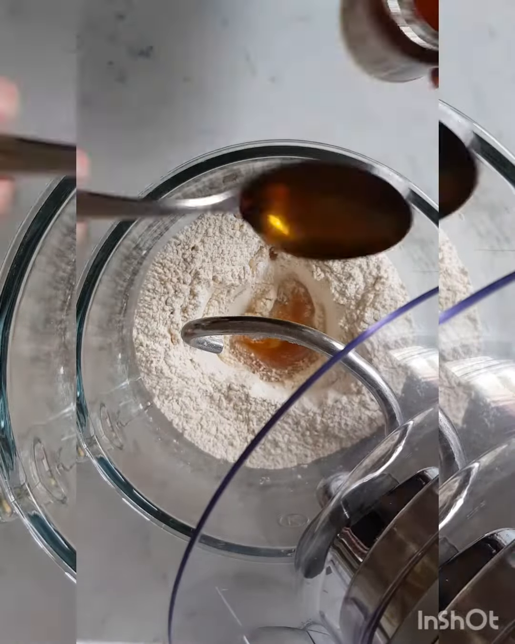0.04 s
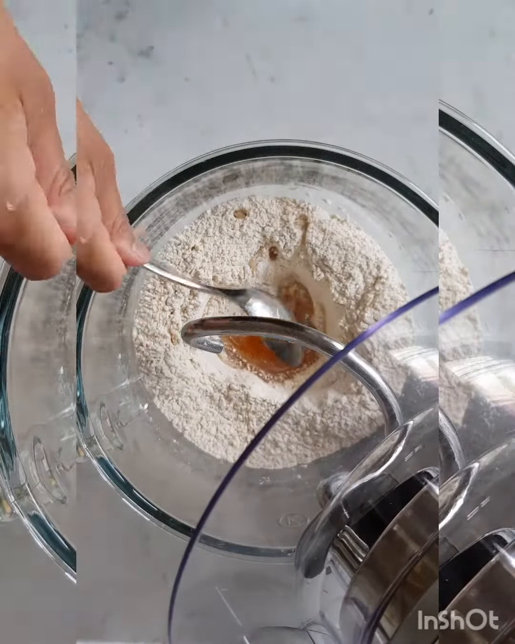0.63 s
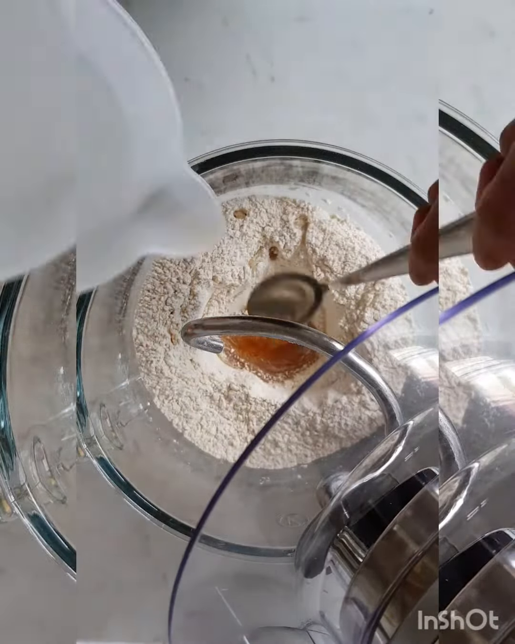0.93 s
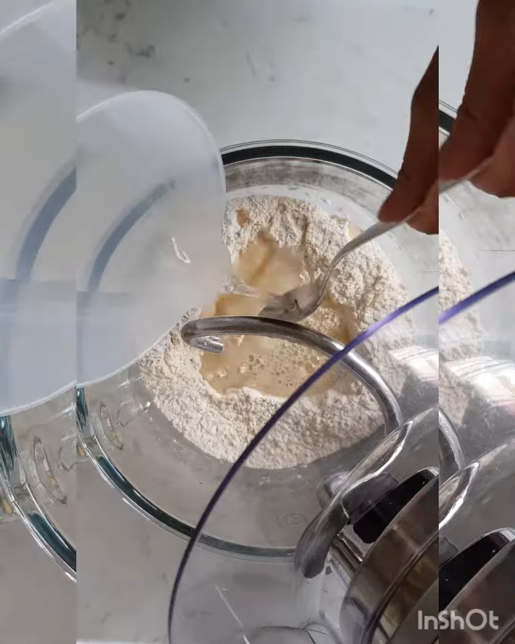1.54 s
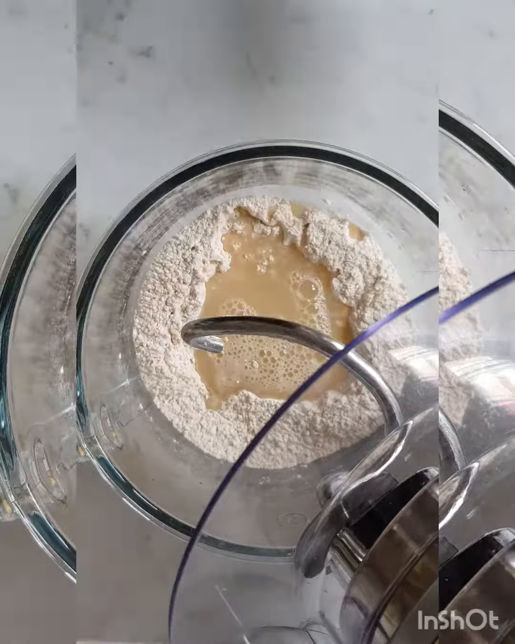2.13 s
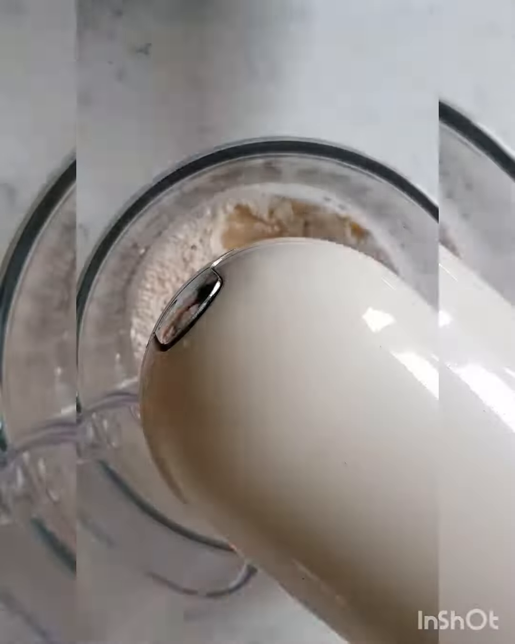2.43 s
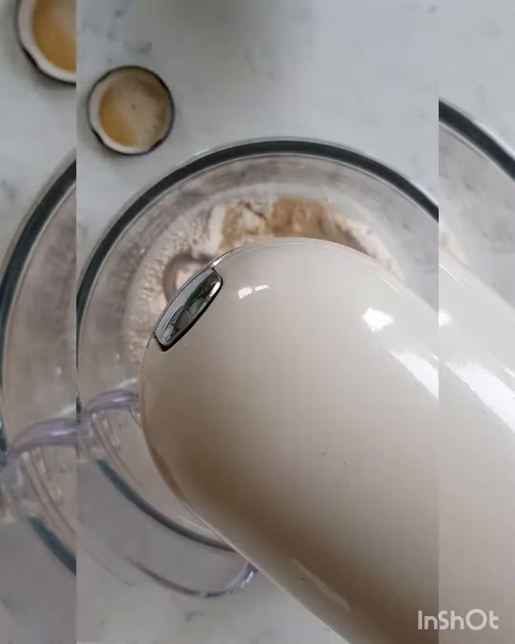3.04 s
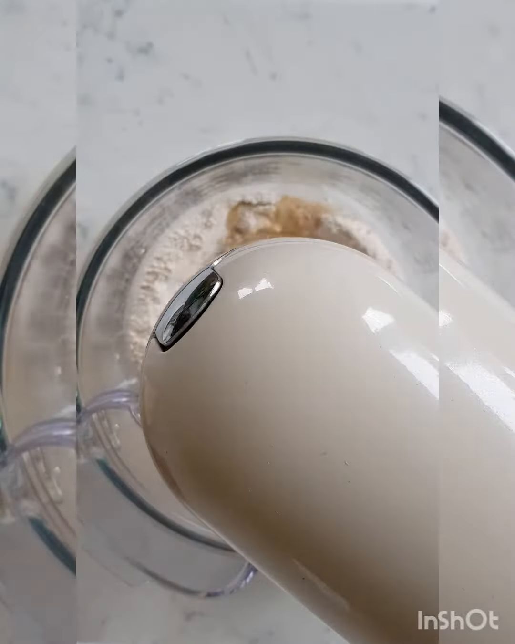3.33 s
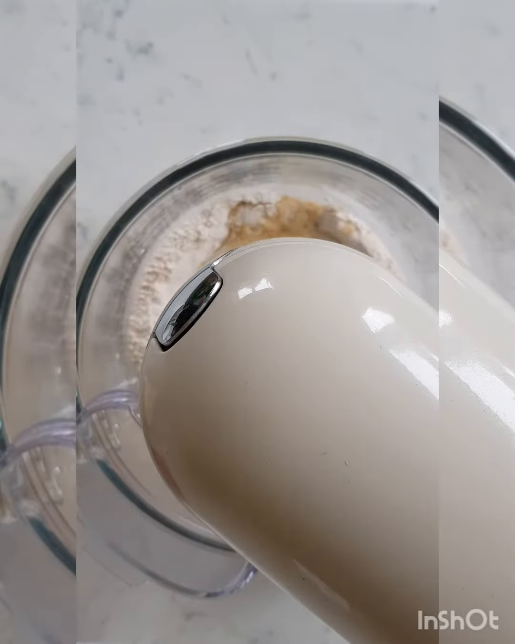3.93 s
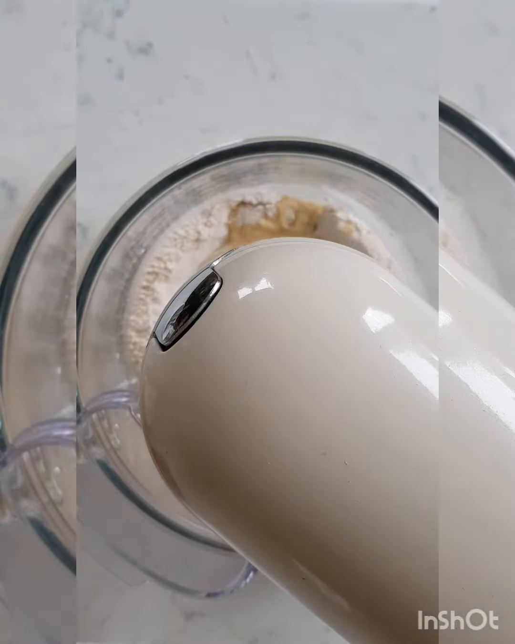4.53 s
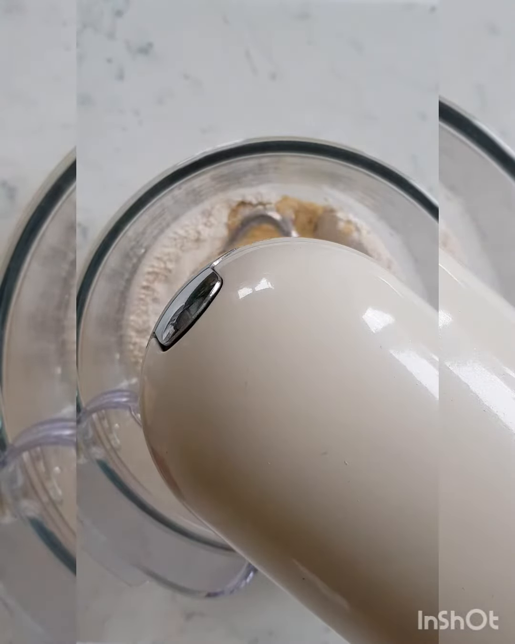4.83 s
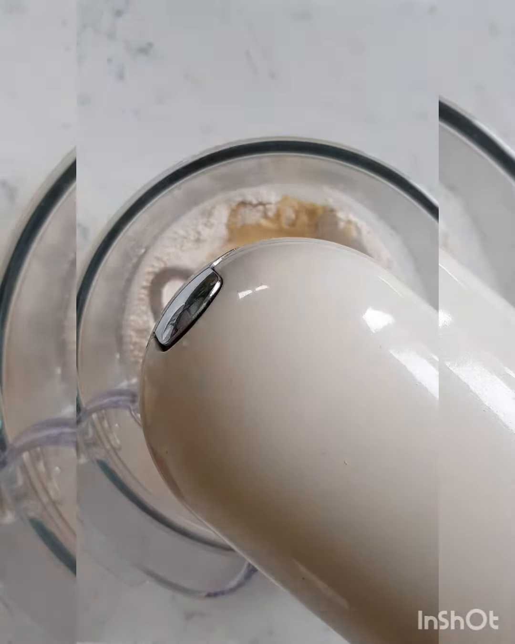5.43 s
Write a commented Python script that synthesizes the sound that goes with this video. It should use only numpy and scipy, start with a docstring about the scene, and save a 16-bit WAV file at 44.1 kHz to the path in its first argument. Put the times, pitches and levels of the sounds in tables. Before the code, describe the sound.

In a quiet kitchen, heard close up, a faint rustle and a few dull knocks and light taps open the scene, and a spoon clinks against a glass bowl at about 0.8 seconds. From 1.1 to 1.7 seconds water gulps and trickles from a jug onto flour, followed by more taps and clinks around 2 seconds. At 2.3 seconds the head of a stand mixer clunks down. At 2.5 seconds the motor jolts into a steady low hum with a whirring rush and a wavering gear whine, and a few sharp clicks follow near 2.8 seconds. From 3.4 seconds the hook bumps irregularly and makes short low groans in the wet dough as the machine rocks. At 5.5 seconds the sound drops out for an instant, then returns as a wider hum with a short hiss on the left.

```python
"""Spoon and jug work over the glass bowl of a stand mixer: dull knocks, taps, ringing clinks.
From 1.1 s water gulps and trickles onto flour. At 2.3 s the head clunks down; at 2.5 s the motor jolts
into mains hum, wavering gear whine and housing rush. From 3.4 s the hook bumps and groans in the dough.
At 5.5 s the sound drops out briefly, then returns as a wide hum with a short hiss on the left."""
import sys
import numpy as np
from scipy.fft import rfft, irfft
from scipy.io import wavfile
from scipy.ndimage import map_coordinates

SR = 44100
rng = np.random.default_rng(int(sys.argv[2]) if len(sys.argv) > 2 else 0)


def store_pcm(level_fs):
    """Save levels as 16-bit WAV."""
    pcm = np.round(np.clip(level_fs, -1, 1) * 32767).astype(np.int16)
    wavfile.write(sys.argv[1], SR, np.atleast_2d(pcm).T)


N = 251370
T = np.arange(N) / SR
HZ = np.fft.rfftfreq(N, 1 / SR)
START_S, SURGE_END_S = 2.478, 2.558
PULL_HZ = 100  # magnetic pull, twice per mains cycle

# contact registers (thud, body, clack, tick): low_hz, high_hz
REGISTERS = [(70, 180), (220, 1220), (1100, 2580), (3500, 7500)]
# light contact, per register: level_db
TAP_TONE_DB = [-13.5, -6.5, -1.5, -2]


def motor():
    """Rush, whine and hum follow one effort curve; the starting surge lifts rush and hum."""
    # motor load: time_s, effort_db
    load = [(2.6, -45), (2.72, -43.0), (2.88, -40), (3.1, -40.5), (3.36, -37.5), (3.47, -44.0),
            (3.6, -42.5), (3.88, -40.0), (4.03, -42), (4.2, -39.5), (4.43, -39.5), (4.53, -41.5),
            (4.72, -38.5), (5.02, -41.5), (5.35, -41.5), (5.44, -38.5)]
    effort_db = curve(load) - np.mean(load, axis=0)[1]
    surge = gate(0, SURGE_END_S, 0.012)
    running = rush(effort_db, surge) + gear_whine(effort_db) + hum(effort_db, surge)
    return running * gate(START_S, 6, 0.014)


def hum(effort_db, surge):
    """Mains hum whose harmonics waver slightly, over a low rumble."""
    # pull harmonics: multiple, level_db
    harmonics = [(1, -3), (2, -6.5), (3, -13.5), (4, -18.5), (6, -20), (7, -17)]
    # rumble spectrum: freq_hz, density_db
    rumble = [(20, -16), (45, -17.5), (75, -9), (115, -3), (140, 4), (170, -9), (240, -10), (330, -26),
              (600, -69)]
    phase = 2 * np.pi * PULL_HZ * T + 0.075 * wobble(7)
    tone = sum(amp(db + 1.1 * wobble(12)) * np.sin(k * phase + 0.33 * wobble(14)) for k, db in harmonics)
    settled = gate(3.42, 6, 0.11)  # hook has broken into the dough
    level_db = -37 + 0.085 * effort_db - 2.7 * settled + 3 * surge
    return amp(level_db) * (np.sqrt(2) * tone + amp(-2.5) * noise(colour(rumble)))


def rush(effort_db, surge):
    """Brushes and gear teeth chatter, hiss and ring in the housing."""
    # housing rush spectrum: freq_hz, density_db
    rush_spectrum = [(130, -31), (230, -8), (330, -11), (420, -8), (530, -15), (620, -6), (850, -13.5),
                     (1100, -8.5), (1350, -8.5), (1700, -14), (2200, -11.5), (2900, -13), (3400, -22),
                     (5000, -44)]
    # brush hiss spectrum: freq_hz, density_db
    brush_spectrum = [(2060, -26), (3500, -4.5), (3910, 4), (4410, -4), (5000, 0), (5580, -5.5),
                      (6650, -3.5), (8850, -6.5), (10200, -7), (11900, -12), (13000, -57)]
    # housing resonances: centre_hz, half_width_hz, level_db
    modes = [(402.6, 16.2, -7), (720, 57, -12.5), (940, 15, -17), (1277, 67, -4.5), (1540, 51, -50),
             (2124, 90, -9), (2693, 33, -17), (3080, 330, -15), (4936, 40, -23), (8670, 360, -25.5)]
    chatter_db = 1.1 * wobble(350) + 0.8 * wobble(30) + 0.5 * np.sin(2 * np.pi * PULL_HZ * T)
    mode_power = sum((amp(db) * unit(1 / (1 + ((HZ - hz) / half_hz) ** 2))) ** 2
                     for hz, half_hz, db in modes)
    housing = amp(-4) * noise(colour(rush_spectrum)) + amp(-3.5) * ticks(np.sqrt(mode_power), per_s=900)
    brush_gain = colour(brush_spectrum)
    brushes = amp(-2.5) * noise(brush_gain) + amp(-9) * ticks(brush_gain, per_s=1100)
    housing_db = -38 + 0.79 * effort_db + 8 * surge
    brush_db = -52 + 0.78 * effort_db + 4 * surge
    return unit(amp(chatter_db)) * (amp(housing_db) * housing + amp(brush_db) * brushes)


def gear_whine(effort_db):
    """Meshing teeth: one wavering tone, louder with effort."""
    # gear mesh: time_s, pitch_hz
    mesh = [(2.6, 1262), (2.95, 1267), (3.15, 1242), (3.4, 1259), (4.3, 1279), (4.7, 1249), (4.95, 1277),
            (5.1, 1265)]
    phase = 2 * np.pi * np.cumsum(curve(mesh) + 7 * wobble(25)) / SR
    return amp(-46 + 0.82 * effort_db) * unit(amp(2.1 * wobble(40)) * np.sin(phase))


def jolt():
    """Inrush current shakes the head until the shaft is up to speed."""
    # buzzing parts: pitch_hz, level_db
    parts = [(400, -35), (690, -53), (810, -43.5), (1310, -36.5), (2110, -38.5), (2740, -41.5)]
    shaking = 1 + 0.41 * np.sin(2 * np.pi * PULL_HZ * T)
    buzz = sum(amp(db) * np.sin(2 * np.pi * hz * T + 1.06 * wobble(70)) for hz, db in parts)
    return gate(START_S, SURGE_END_S, 0.01) * shaking * buzz


def bumps():
    """The hook shoves dough against the bowl; the machine rocks on its feet."""
    # hook blows: centre_s, half_length_s, level_db, tilt_db_per_octave, ring_hz
    shoves = [(3.657, 0.0043, -22, -5, 151), (4.206, 0.009, -34.5, -2, 146), (4.444, 0.011, -43.5, 1, 1750),
              (4.744, 0.013, -39.5, 1.5, 459.8), (4.907, 0.0093, -34.5, -6, 309),
              (5.212, .0062, -30.5, 1.8, 1590), (5.252, 0.0024, -38, -4, 440)]
    # rocking: centre_s, half_length_s, pitch_hz, level_db
    rocks = [(3.679, 0.0082, 86, -25), (4.138, 0.014, 52, -29.5), (4.931, 0.013, 55, -31),
             (5.222, 0.01, 62, -30)]
    tone_db = [-7.5, 1.5, -2.5, -15]  # per register
    noises = register_noises()
    blows = sum(contact(noises, s, half_s, db + tilted(tone_db, tilt, pivot_hz=506), hz, db - 3.5)
                for s, half_s, db, tilt, hz in shoves)
    rocking = sum(amp(db) * bell(T - s, half_s) * np.sin(2 * np.pi * hz * (T - s))
                  for s, half_s, hz, db in rocks)
    return blows + rocking


def groans():
    """Wet dough sticks and slips under the hook: short low notes."""
    # dough rubs: centre_s, half_length_s, pitch_hz, level_db
    rubs = [(3.426, 0.009, 308.5, -15.5), (3.908, 0.0074, 273, -26.5), (4.776, 0.0056, 358, -19.5),
            (4.804, 0.0063, 306, -27)]
    out = np.zeros(N)
    for s, half_s, hz, db in rubs:
        t = T - s
        out += amp(db - 3) * bell(t, half_s) * np.sin(2 * np.pi * hz * t * (1 - 0.18 * t))
    return out


def clinks():
    """The spoon strikes the bowl and scrapes on; flour damps the glass, fingers damp the steel."""
    # spoon strikes: start_s, bowl_db, spoon_db, tilt_db_per_octave
    strikes = [(0.807, -33.5, -73, -0.5), (1.809, -47.5, -72, -13), (1.944, -70, -44.5, -15),
               (1.966, -59, -30.5, 1)]
    # glass modes: pitch_hz, level_db, t60_s
    bowl_modes = [(1242, 0, 0.049), (2150, -12, 0.045), (3374, -4, 0.035), (4980, -11, 0.038),
                  (5730, -8, 0.028), (5960, -17, 0.033)]
    # steel modes: pitch_hz, level_db, t60_s
    spoon_modes = [(5110, -0.5, 0.048), (5260, -1, 0.032), (7120, -8.5, 0.058), (8000, -30, 0.046),
                   (9200, -5, 0.046)]
    out, noises = np.zeros(N), register_noises()
    for s, bowl_db, spoon_db, tilt in strikes:
        glass = amp(bowl_db) * ring(bowl_modes, tilt, rise_s=0.0081)
        steel = amp(spoon_db) * ring(spoon_modes, tilt, rise_s=0.0057)
        out[int(s * SR):][:len(glass)] += glass + steel
        scrape_db = max(bowl_db - 23.5, spoon_db - 10.5)
        out += contact(noises, s + 0.013, half_s=0.007, levels_db=scrape_db + np.array(TAP_TONE_DB),
                       ring_hz=845, ring_db=scrape_db - 7.5)
    return out


def knocks():
    """Spoon, jug and mixer head hit bowl and counter; softer touches are mostly thud."""
    # heavy contacts: centre_s, half_length_s, level_db, tilt_db_per_octave, ring_hz, ring_db
    hits = [(0.127, 0.0063, -61, -10.5, 587, -53), (0.142, .01, -57.5, -10, 386, -43.5),
            (0.378, .007, -59.5, -7.5, 252, -59), (0.435, 0.0087, -64, -7.5, 106, -47),
            (0.737, 0.0049, -44.5, -6.5, 860, -50), (0.754, 0.0048, -47.5, -9, 395, -43.5),
            (1.404, 0.0068, -57.5, -1, 430, -55), (2.119, 0.0058, -51.5, -5.5, 640, -44),
            (2.29, 0.0051, -65.5, -1.5, 400, -55), (2.313, 0.0069, -34, -0.8, 278, -40.5)]
    # heavy contact, per register: level_db
    tone_db = [0, -1, 1, -1]
    noises = register_noises()
    return sum(contact(noises, s, half_s, db + tilted(tone_db, tilt, pivot_hz=446), hz, ring_db)
               for s, half_s, db, tilt, hz, ring_db in hits)


def taps():
    """Steel, glass and plastic tap and rattle lightly."""
    # light contacts: centre_s, half_length_s, level_db, tilt_db_per_octave, ring_hz, ring_db
    hits = [(0.341, 0.0044, -74, 3, 2230, -56), (0.371, 0.011, -74, 8, 4470, -71),
            (0.444, 0.0084, -79.5, 11.5, 4430, -72), (1.594, .0024, -49.5, 4, 1297, -44.5),
            (1.751, 0.006, -53.5, -3, 1996, -57), (1.82, .008, -76, 5.5, 2870, -62.5),
            (1.821, .007, -84, -4, 5670, -65), (1.937, .006, -59, -4, 1970, -70),
            (2.196, 0.0064, -61.5, -3, 2630, -69), (2.365, .003, -60.5, -2, 1390, -67),
            (2.663, 0.0036, -42, -4, 1200, -38.5), (2.772, 0.0021, -32.5, 0, 3210, -31),
            (2.773, 0.0027, -53, -3, 1620, -36), (2.802, 0.0096, -44, -3.5, 4100, -50.5),
            (2.827, 0.0051, -48, 1, 3050, -40.5), (2.85, 0.0063, -44, -4, 5260, -52)]
    noises = register_noises()
    return sum(contact(noises, s, half_s, db + tilted(TAP_TONE_DB, tilt, pivot_hz=1670), hz, ring_db)
               for s, half_s, db, tilt, hz, ring_db in hits)


def pour(start_s=1.3, end_s=1.72, bubble_count=500):
    """Water lands on spoon and flour: gulps trap ringing air; the flow drives bubbles and spray."""
    # gulps from the jug: start_s, length_s, level_db, pocket_hz
    gulps = [(1.103, 0.016, -59, 1500), (1.17, 0.015, -62, 1500), (1.2, 0.035, -56, 1960),
             (1.234, 0.025, -56, 1650), (1.275, .024, -55.5, 1840), (1.329, 0.023, -59, 4000),
             (1.36, 0.026, -53.5, 4400), (1.393, 0.019, -61, 1940), (1.444, 0.0096, -68, 4100),
             (1.521, 0.03, -57.5, 1800), (1.562, 0.033, -56, 3800), (1.662, 0.014, -59, 4600),
             (1.677, 0.015, -53, 3500)]
    # spray spectrum: freq_hz, density_db
    splash = [(180, -26), (300, -8), (428, -1), (757, -19), (1540, -4.5), (2230, -16.5), (4070, -14.5),
              (8810, -13.5), (12000, -26), (15600, -64), (22000, -120)]
    drain_s, pocket_s, glide_per_s = 0.0066, 0.004, 3.1
    flow = amp(-71.5) * gate(start_s, end_s, 0.012)  # thin stream between gulps
    t = np.arange(SR // 30) / SR
    bubbles, gurgles = np.zeros(N), np.zeros(N)
    for s, length_s, db, pocket_hz in gulps:
        flow += amp(db) * gate(s, 6, 0.0056) * np.exp(-np.maximum(T - s - length_s, 0) / drain_s)
        gurgle = t * np.exp(-t / pocket_s) * np.sin(2 * np.pi * pocket_hz * t * (1 + glide_per_s * t))
        gurgles[int(s * SR):][:len(t)] += amp(db - 11) * unit(gurgle)
    for when, pitch, size in rng.random((bubble_count, 3)):
        s, hz = start_s + when * (end_s - start_s), 1400 * 8 ** pitch
        bubble = np.exp(-t * hz / 5) * np.sin(2 * np.pi * hz * t)
        bubbles[int(s * SR):][:len(t)] += amp(12 * size ** 2) * unit(bubble)
    bubbles = unit(bubbles) * np.sqrt((end_s - start_s) * SR / N)  # rms 1 during the stream
    spray = amp(-3.5 + 3.2 * wobble(140)) * noise(colour(splash))
    return gurgles + flow * (amp(-2) * bubbles + spray)


def wide_hum(start_s=5.529, burst_end_s=5.615):
    """Hum in opposite phase left and right; opens with hiss and whine left, a thump right."""
    # hiss spectrum: freq_hz, density_db
    hiss_spectrum = [(150, 2), (300, -1.5), (480, -5.5), (900, -6.5), (1350, -4.5), (1900, -10.5),
                     (4000, -22.5), (15000, -23.5)]
    burst = gate(start_s, burst_end_s, 0.0014)
    drone = np.sqrt(2) * np.sin(2 * np.pi * PULL_HZ * T + 0.3 * wobble(30))
    shake = noise(band(162.5, 200, order=6)) * (0.4 * burst + 0.64)
    whine = sum(np.sin(2 * np.pi * hz * T + 0.44 * wobble(60)) for hz in (1150, 1280, 1420))
    hiss = noise(colour(hiss_spectrum)) + amp(-8.5) * whine
    floor = amp(-62) * noise(band(200, 910, order=2))
    thump = amp(-38) * burst * noise(band(20, 70))
    left = amp(-28.5) * shake - amp(-35.5) * drone + hiss * (amp(-29.5) * burst + amp(-47))
    right = drone * (amp(-32.5) + amp(-33) * burst) - amp(-38.5) * shake + floor + thump
    return np.array([left, right]) * gate(start_s, 6, 0.0014)


def rustle():
    """A hand moves the jar away: soft, fading noise."""
    return amp(-63) * gate(-1, 0.39, 0.44) * noise(band(810, 940))


def room():
    """Quiet kitchen air with a faint low drone."""
    # air spectrum: freq_hz, density_db
    spectrum = [(20, -5), (55, 11.5), (90, -6), (150, -1.5), (210, -8.5), (450, -16.5), (696, -26),
                (990, -16.5), (1200, -30), (2400, -29.5), (3350, -41.5), (5000, -35), (8000, -30.5),
                (9500, -43), (13000, -59)]
    # air loudness: time_s, level_db
    levels = [(0, -55), (0.25, -56), (0.55, -59), (1.0, -57), (2.0, -59), (2.45, -58)]
    drone = amp(-63.5 + 1.5 * wobble(11)) * np.sin(2 * np.pi * 146 * T + 1.6 * wobble(13))
    return amp(curve(levels)) * noise(colour(spectrum)) + drone


def contact(noises, centre_s, half_s, levels_db, ring_hz, ring_db):
    """One blow: a noise swell in four registers and a rough ringing note."""
    out = np.zeros(N)
    span = slice(max(int((centre_s - 0.06) * SR), 0), int((centre_s + 0.12) * SR))
    t = T[span] - centre_s
    tail = amp(-30) * (t > 0) * np.exp(-np.abs(t / half_s) / 3)
    swell = bell(t, half_s) + tail
    bursts = noises[:, span] * swell
    bursts *= np.sqrt(np.sum(swell ** 2) / np.sum(bursts ** 2, axis=1, keepdims=True))  # equal energy
    note = np.sin(2 * np.pi * ring_hz * t + 0.46 * noises[0, span])
    out[span] = amp(levels_db) @ bursts + amp(ring_db + 7.5) * swell * note
    return out


def ring(modes, tilt_db_per_octave, rise_s):
    """Damped modes, roughened by the sliding contact."""
    t = np.arange(SR // 4) / SR
    decay_s = np.maximum(t - 2 * rise_s, 0)
    tone = np.zeros(len(t))
    for hz, db, t60_s in modes:
        level_db = db + tilt_db_per_octave * np.log2(hz / modes[0][0]) - 60 * decay_s / t60_s
        phase = 2 * np.pi * (hz * t + rng.random()) + 0.052 * wobble(340)[:len(t)]
        tone += amp(level_db) * np.sin(phase)
    return tone * (1 - np.exp(-(t / rise_s) ** 2))


def register_noises():
    """One noise per register."""
    return np.array([noise(band(low_hz, high_hz)) for low_hz, high_hz in REGISTERS])


def tilted(tone_db, db_per_octave, pivot_hz):
    """Register levels in dB, tilted about a pivot."""
    centres_hz = np.sqrt(np.prod(REGISTERS, axis=1))
    return np.array(tone_db) + db_per_octave * np.log2(centres_hz / pivot_hz)


def ticks(gain, per_s):
    """Random tiny impacts, shaped by a gain per frequency; rms 1."""
    impacts = (rng.random(N) < per_s / SR) * rng.standard_normal(N)
    return unit(filtered(impacts, gain))


def noise(gain):
    """Noise shaped by a gain per frequency; rms 1."""
    return unit(filtered(rng.standard_normal(N), gain))


def filtered(x, gain):
    """Apply a gain per frequency."""
    return irfft(rfft(x) * gain, N)


def colour(points):
    """Gain per frequency from (freq_hz, level_db) points, log axis."""
    hz, db = np.transpose(points)
    return amp(np.interp(np.log(HZ + 1), np.log(hz), db))


def band(low_hz, high_hz, order=4):
    """Band-pass gain."""
    return 1 / np.sqrt((1 + (low_hz / (HZ + 1)) ** (2 * order)) * (1 + (HZ / high_hz) ** (2 * order)))


def curve(points):
    """(time_s, value) points interpolated per sample."""
    return np.interp(T, *np.transpose(points))


def wobble(knots_per_s):
    """Smooth random curve."""
    return map_coordinates(rng.standard_normal(int(N * knots_per_s / SR) + 4), [T * knots_per_s])


def gate(start_s, end_s, ramp_s):
    """Window with linear ramps inside its ends."""
    return np.clip((T - start_s) / ramp_s, 0, 1) * np.clip((end_s - T) / ramp_s, 0, 1)


def bell(t, half_s):
    """Gaussian swell, height 1 at t = 0."""
    return np.exp(-(t / half_s) ** 2 / 2)


def amp(db):
    """Decibels to gain."""
    return 10 ** (np.asarray(db) / 20)


def unit(x):
    """Scale to rms 1."""
    return x / np.sqrt(np.mean(x ** 2) + 1e-30)


def scene(dropout_s=5.5):
    """Close and nearly mono up to the dropout; wide after it."""
    kitchen = room() + rustle() + knocks() + taps() + bumps() + clinks() + pour() + groans()
    mono = (kitchen + jolt() + motor()) * gate(-1, dropout_s, 0.023)
    mono = filtered(mono, band(12, 10890, order=24))  # dull top octave
    side = amp(-51) * filtered(mono, band(5000, 13000) * 1j)  # treble shifted 90 degrees
    return np.array([mono + side, mono - side]) + wide_hum()


def record(dry, top_hz=15800):
    """Short edge fades and a band limit."""
    return filtered(dry * gate(0, N / SR, 0.002), np.clip((top_hz - HZ) / 300, 0, 1))


dry = scene()
out = record(dry)
store_pcm(out)
```